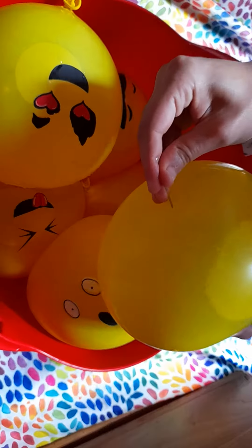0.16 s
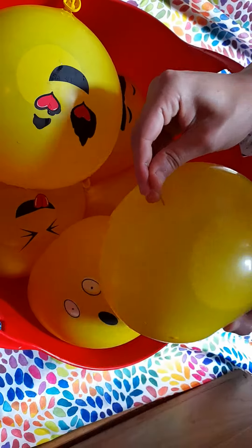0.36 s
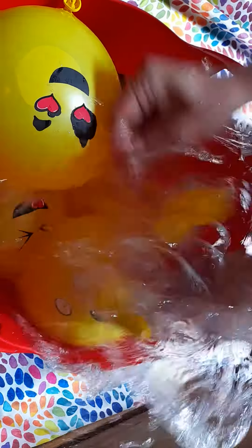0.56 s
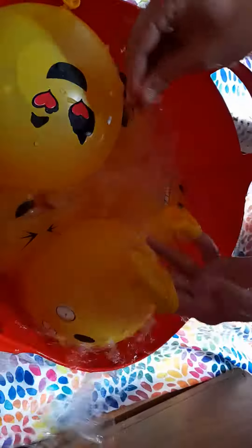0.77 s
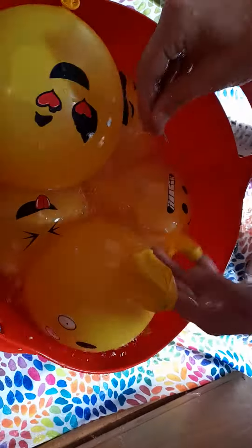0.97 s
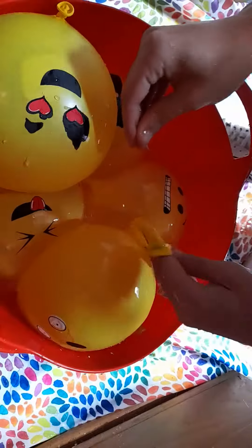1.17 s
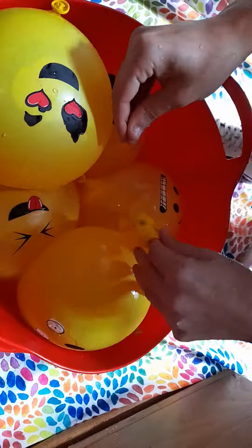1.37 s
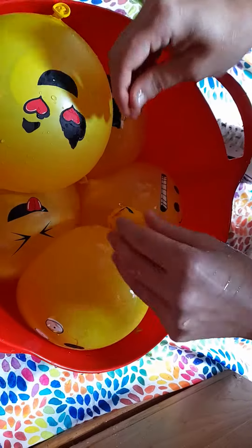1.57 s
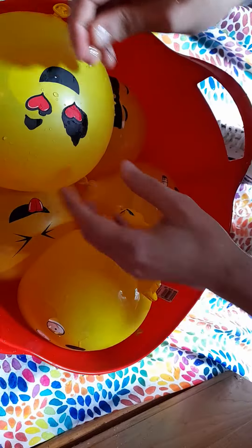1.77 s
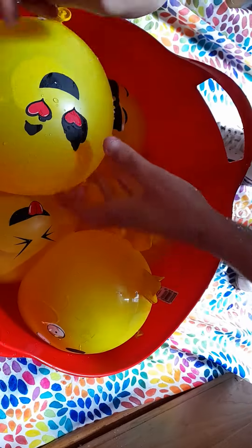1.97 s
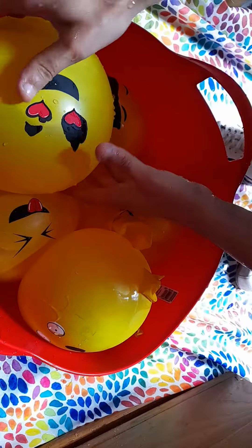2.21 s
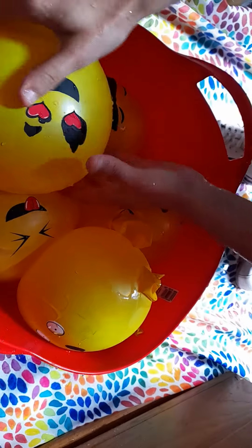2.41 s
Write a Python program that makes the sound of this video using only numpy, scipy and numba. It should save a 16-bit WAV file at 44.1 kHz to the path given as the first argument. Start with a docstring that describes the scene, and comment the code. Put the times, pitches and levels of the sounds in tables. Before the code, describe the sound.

A water balloon bursts with a sharp wet pop, splashing over a plastic tub, then dripping

```python
"""In a small room, close to the microphone, a water balloon is pricked over a plastic tub of other balloons.
The skin rips as jerky noise, and a puff of air swings mostly the right side with a slow, dying wave.
Water falls as random clicks (spray, slaps, drumming on the tub) and ringing bubbles, and thins to drips.
Wet rubber ticks, squeaks and snaps in shaped noise and short rings; a hand bumps a full balloon,
heard as a few sinking tones. A faint hiss and a low rumble lie underneath."""
import sys
import numpy as np
from scipy import signal
from scipy.fft import rfft, irfft, next_fast_len
from scipy.io import wavfile
from numba import njit

SR = 44100
rng = np.random.default_rng(int(sys.argv[2]) if len(sys.argv) > 2 else 0)


def generate_wav(sig):
    """Save sig (samples, or channels by samples) to the path in sys.argv[1] as 16-bit PCM at SR."""
    pcm = np.round(np.clip(np.atleast_2d(sig).T, -1, 1) * 32767).astype(np.int16)
    wavfile.write(sys.argv[1], SR, pcm)


N = 108045
T = np.arange(N) / SR  # time of every sample, s
SIDES = np.array([[1], [-1]])  # left, right


def amp(db):
    """Turn decibels into gain."""
    return 10 ** (np.asarray(db) / 20)


def curve(rows, at):
    """Draw straight lines through (time, value) rows."""
    return np.interp(at, *np.array(rows).T)


def pan(db):
    """Left and right gains for a level difference; positive makes the left louder."""
    return amp(SIDES * db / 2)


def colour(x, points):
    """Filter through (Hz, dB) points, never ringing before the sound; white noise keeps its power."""
    size = next_fast_len(2 * N)
    hz, db = np.array(points, float).T
    grid_hz = np.arange(size // 2 + 1) * SR / size
    gain = amp(np.interp(np.log(grid_hz + 1), np.log(hz), db))
    # Folding the cepstrum forward in time gives the filter its minimum phase.
    cepstrum = irfft(np.log(gain / np.sqrt(np.mean(gain ** 2))), size)
    cepstrum[1:size // 2] *= 2
    cepstrum[size // 2 + 1:] = 0
    return irfft(rfft(x, size) * np.exp(rfft(cepstrum)), size)[..., :N]


def noise(alike):
    """Stereo white noise; the share "alike" of its power is common to both sides."""
    alike = np.clip(alike, 0, 1)
    common = np.sqrt(alike) * rng.standard_normal(N)
    return common + np.sqrt(1 - alike) * rng.standard_normal((2, N))


CONTACT_S = 0.00065  # length of the quick start


def fade(start, decay):
    """A quick start, then an exponential decay, like a short knock."""
    age = np.maximum(T - start, 0)
    return np.minimum(age / CONTACT_S, 1) * np.exp(-age / decay)


@njit
def rings(start, hz, t60, size, glide, rise):
    """Add up dying tones that swell over some cycles and glide up (down if glide is negative)."""
    out = np.zeros(N)
    for k in range(len(start)):
        first = int(start[k] * SR) + 1
        last = min(first + int(t60[k] * SR), N)
        for i in range(max(first, 0), last):
            t = i / SR - start[k]
            age = t / t60[k]
            swell = 1 - np.exp(-t * hz[k] / rise)
            tone = np.sin(2 * np.pi * hz[k] * t * (1 + glide * age))
            out[i] += size[k] * np.exp(-6.9 * age) * swell * tone
    return out


FULL_FLOW_DB, THINNING_DB = -28, 38  # level of the full flow; fall in level that leaves a tenth of the drops
SIDE_SPREAD_DB, SIDE_LAG_S = 3, .00016  # largest shift of each side, up or down, early or late


def shower(levels, per_s, scatter_db, count):
    """Random drops, fewer as the flow falls: times and sizes at each side, and a spare chance per drop."""
    when, spare, weight, side, angle = rng.random((count, 5)).T
    length = T[-1] - levels[0][0]
    time = levels[0][0] + when * length
    db = curve(levels, time)
    offered = count / length
    thinned = per_s * 10 ** (np.minimum(db - FULL_FLOW_DB, 0) / THINNING_DB)
    rate = np.minimum(thinned, offered)
    keep = rng.random(count) < rate / offered
    size = amp(-scatter_db * np.log(np.maximum(weight, .015)))  # many small drops, a few large
    # Fewer drops are each made larger, so the level still follows the table.
    size = size / np.sqrt(np.mean(size ** 2) * rate) * amp(db)
    size = size * rng.choice([-1, 1], count)
    times = time + SIDES * SIDE_LAG_S * (2 * angle - 1)
    sizes = size * amp(SIDES * SIDE_SPREAD_DB * (2 * side - 1))
    return times[:, keep], sizes[:, keep], spare[keep]


def clicks(times, sizes):
    """One sharp click for each drop at each side."""
    heard = []
    for t, s in zip(times, sizes):
        sample = np.clip(t * SR, 0, N).astype(int)
        heard.append(np.bincount(sample, s, N + 1)[:N])
    return np.array(heard) * np.sqrt(SR)


BUBBLE_GLIDE = .15  # strength of the upward glide


def swarm(times, sizes, hz, cycles):
    """Ringing bubbles; at equal size, short and long ones get about equal energy."""
    t60 = cycles / hz
    evened = np.sqrt(4 * np.log(1000) / t60)
    return np.array([rings(t, hz, t60, s * evened, BUBBLE_GLIDE, 0.35) for t, s in zip(times, sizes)])


# Tone of the faint hiss [f/Hz, level/dB]
FLOOR_COLOUR = [(100, -5), (300, -0.5), (600, -1.5), (1100, 1), (2200, 0), (3200, -4.5), (6000, 0),
                (8300, -11.5), (13000, -7), (16000, -11.5)]
# Tone of the low rumble [f/Hz, level/dB]
RUMBLE_COLOUR = [(15, -25.5), (60, 5), (110, -2.5), (250, -17), (600, -20), (3000, -59.5)]
FLOOR_DB, FLOOR_SWELL_DB, RUMBLE_DB = -77.5, 11.5, -78  # hiss at the start; its rise to the end; rumble


def background():
    """Filtered noise makes a slowly swelling hiss and a steady low rumble."""
    hiss = colour(noise(0.17), FLOOR_COLOUR) * amp(FLOOR_DB + FLOOR_SWELL_DB * T / T[-1])
    return hiss + colour(noise(0.42), RUMBLE_COLOUR) * amp(RUMBLE_DB)


ROOM_T60_S, ROOM_TREBLE_T60_S = 0.19, 0.28  # time to die by 60 dB, below and above 3 kHz
ROOM_DB, ROOM_TREBLE_DB, ROOM_GAP_S = -8, -11, .004  # echo levels; wait before the echo


def room(x):
    """Many echoes blur into dying noise; the bass echo is stronger, the treble echo dies more slowly."""
    t = T[:SR // 2]
    out = x
    for kind, t60, db in (("low", ROOM_T60_S, ROOM_DB), ("high", ROOM_TREBLE_T60_S, ROOM_TREBLE_DB)):
        tail = rng.standard_normal((2, len(t))) * amp(-60 * t / t60) * (t > ROOM_GAP_S)
        tail = tail / np.sqrt(np.sum(tail[0] ** 2))
        tail = signal.sosfilt(signal.butter(2, 3000, kind, fs=SR, output="sos"), tail)
        mixed = tail + 0.21 * tail[::-1]  # a little of the other side
        out = out + amp(db) * signal.fftconvolve(x, mixed, axes=1)[:, :N]
    return out


TUB_ECHO_DB, TUB_NEAR_S, TUB_FAR_S = -13, .0004, .004  # level of each echo; shortest and longest delay


def tub(x, count=3):
    """The plastic walls throw the treble back within a few milliseconds, differently to each side."""
    bright = signal.sosfilt(signal.butter(2, 2200, "high", fs=SR, output="sos"), x)
    delay = TUB_NEAR_S + (TUB_FAR_S - TUB_NEAR_S) * rng.random((2, count))
    lags = (delay * SR).astype(int)
    echoes = [sum(np.pad(side, (k, 0))[:N] for k in row) for side, row in zip(bright, lags)]
    return x + amp(TUB_ECHO_DB) * np.array(echoes)


# How much louder the left side hears than the right [f/Hz, level/dB]
SIDE_BALANCE = [(200, -0.5), (1100, -.5), (2100, 2.5), (3800, 0.5), (8000, -3), (13000, -1.5)]


def balance(x):
    """The two sides hear treble and bass unequally: half the difference goes to each."""
    left = colour(x[0], [(hz, db / 2) for hz, db in SIDE_BALANCE])
    right = colour(x[1], [(hz, -db / 2) for hz, db in SIDE_BALANCE])
    return np.array([left, right]) * pan(-0.94)


# Tones of a bumped full balloon [f/Hz, level/dB, time to die by 60 dB t60/s]
BUMP_MODES = [(170, -44, 0.058), (307, -24.5, 0.025), (598, -26, 0.028), (820, -36, 0.025)]
# Tone of the water sloshing inside [f/Hz, level/dB]
SLOSH_COLOUR = [(50, -5), (160, -12), (320, 4), (480, 2.5), (700, 2.5), (1000, -16), (1400, -26),
                (5000, -26)]
BUMP_S, BUMP_RISE_S, BUMP_PAN_DB = 2.2495, 0.0073, 4
BUMP_STRETCH, BUMP_RELAX_S = 0.495, .007  # the pressed skin starts sharp by this share, then relaxes
SLOSH_DB, SLOSH_DECAY_S = -45, 0.024


def bump():
    """A hand bumps a full balloon: its pitch drops as the skin relaxes, and its water sloshes."""
    age = np.maximum(T - BUMP_S, 0)
    turns = age + BUMP_STRETCH * BUMP_RELAX_S * (1 - np.exp(-age / BUMP_RELAX_S))
    skin = sum(amp(db - 60 * age / t60) * np.sin(2 * np.pi * hz * turns) for hz, db, t60 in BUMP_MODES)
    slosh = colour(noise(0.84), SLOSH_COLOUR) * fade(BUMP_S, SLOSH_DECAY_S) * amp(SLOSH_DB)
    rise = 1 - np.exp(-(age / BUMP_RISE_S) ** 2)
    return (skin + slosh) * rise * pan(BUMP_PAN_DB)


SQUEAK_S, SQUEAK_HZ, SQUEAK_DB, SQUEAK_T60_S, SQUEAK_PAN_DB = 1.7348, 5270, -41.5, 0.015, -10


def squeak():
    """A wet finger slips on rubber for an instant: one short high tone that glides slightly down."""
    start, hz, t60 = np.array([SQUEAK_S]), np.array([1. * SQUEAK_HZ]), np.array([SQUEAK_T60_S])
    return rings(start, hz, t60, amp([SQUEAK_DB]), -.03, 4.0) * pan(SQUEAK_PAN_DB)


# Tone of the snapping rubber [f/Hz, level/dB]
SNAP_COLOUR = [(150, -26), (600, -6), (1400, -14.5), (2000, -5), (2400, 2), (3100, -11), (4200, -6.5),
               (6000, -18.5), (9000, -28), (16000, -29)]
SNAP_S, SNAP_DB, SNAP_DECAY_S, SNAP_PAN_DB = 1.6683, -39.5, 0.0046, 2.5
SNAP_TAIL_DB, SNAP_TAIL_S = -17.5, 0.02  # tail level below the crack; its decay
SNAP_RING_HZ, SNAP_RING_DB, SNAP_RING_T60_S = 2390, -40.5, 0.019


def snap():
    """A scrap of rubber snaps: a noisy crack with a fainter, longer tail, and a brief ring."""
    crack = fade(SNAP_S, SNAP_DECAY_S) + amp(SNAP_TAIL_DB) * fade(SNAP_S, SNAP_TAIL_S)
    noisy = colour(noise(0.46) * crack, SNAP_COLOUR) * amp(SNAP_DB)
    ring = fade(SNAP_S, SNAP_RING_T60_S / np.log(1000)) * np.sin(2 * np.pi * SNAP_RING_HZ * (T - SNAP_S))
    return (noisy + amp(SNAP_RING_DB) * ring) * pan(SNAP_PAN_DB)


# Small drops and wet rubber ticking near the microphone [t/s, level/dB, left over right level/dB]
TICKS = [(.224, -31, 28), (.233, -50, -2), (0.323, -35.5, 18.5), (0.331, -18, -0.5), (0.34, -46, -5),
         (0.531, -25, -16), (0.628, -26, -8), (0.633, -27, 3), (0.642, -22.5, -5), (0.647, -28, 14),
         (0.793, -31, -5), (.869, -42, -7), (.936, -43, -2), (1.026, -44, 7), (1.054, -37.5, -2),
         (1.149, -47, 7), (1.177, -39.5, 7), (1.196, -41, -2), (1.24, -54, -13), (1.326, -59, 0),
         (1.396, -51.5, 0), (1.465, -50, 4.5), (1.546, -61.5, -4), (1.602, -54, 4), (1.729, -59, 5),
         (1.874, -51.5, 3), (1.891, -55, -3)]
# Tone of the ticks [f/Hz, level/dB]
TICK_COLOUR = [(300, -34), (2000, -8), (6000, 15), (8500, 3), (13000, 14), (16500, -6)]
TICK_DECAY_S = 0.0023


def ticks():
    """Drops and wet rubber tick: tiny bright bursts of noise."""
    shape = sum(fade(t, TICK_DECAY_S) * amp(db) * pan(side) for t, db, side in TICKS)
    return colour(noise(0.16) * shape, TICK_COLOUR)


# Level of the water drumming on the tub [t/s, level/dB]
DRUM = [(.14, -51), (.22, -54), (.31, -38), (.45, -45.5), (.52, -36), (.6, -44.5), (.68, -38.5), (.81, -43),
        (.91, -49), (.98, -61.5), (1.05, -57), (1.15, -62), (1.28, -65.5), (1.38, -89), (1.6, -105)]
# Tone of the drumming [f/Hz, level/dB]
DRUM_COLOUR = [(30, -28), (65, -9), (95, -7.5), (117, 1.5), (140, -3), (168, -1), (200, -1.5), (235, 0),
               (270, 0.5), (320, -1.5), (500, -16.5), (1500, -64.5)]


def drumming():
    """Heavy water thuds on the tub and the balloons in it: random clicks filtered down to the bass."""
    times, sizes, _ = shower(DRUM, 1800, 3.55, count=6000)
    return colour(clicks(times, sizes), DRUM_COLOUR) * pan(0.32)


# Level of the fine spray [t/s, level/dB]
SPRAY = [(.12, -37.5), (.19, -36), (.27, -32), (.33, -27), (.42, -33.5), (.53, -29), (.6, -42),
         (.645, -36.5), (.68, -44), (.81, -44.5), (.92, -57.5), (1.01, -53), (1.05, -54.5), (1.12, -59),
         (1.195, -57), (1.23, -65.5), (1.5, -72.5), (1.9, -69.5), (2.45, -67.5)]
# Tone of the spray [f/Hz, level/dB]
SPRAY_COLOUR = [(200, -30.5), (1000, -3.5), (2500, 5.5), (3700, 1.5), (5500, 4), (7000, 2), (8200, -5.5),
                (10500, -3), (13500, 0), (16000, -10)]
DROPS_PER_S, DROP_SCATTER_DB, PATTER_DB, SPRAY_PAN_DB = 4000, 3, -1.5, 0  # drops at full flow
FIZZ_PER_S, FIZZ_SCATTER_DB, FIZZ_DB = 3500, 1.5, -2.5  # tiny bubbles at full flow
FIZZ_LOW_HZ, FIZZ_HIGH_HZ, FIZZ_CYCLES = 1204, 15660, 36  # cycles until a bubble has died by 60 dB


def spray():
    """Fine droplets patter on rubber, cloth and floor as clicks, and tiny bubbles fizz as short rings."""
    times, sizes, _ = shower(SPRAY, DROPS_PER_S, DROP_SCATTER_DB, count=30000)
    patter = clicks(times, sizes)
    times, sizes, spare = shower(SPRAY, FIZZ_PER_S, FIZZ_SCATTER_DB, count=15000)
    hz = FIZZ_LOW_HZ + (FIZZ_HIGH_HZ - FIZZ_LOW_HZ) * spare
    fizz = swarm(times, sizes, hz, FIZZ_CYCLES)
    return colour(amp(PATTER_DB) * patter + amp(FIZZ_DB) * fizz, SPRAY_COLOUR) * pan(SPRAY_PAN_DB)


# Level of the splashing [t/s, level/dB]
SPLASH = [(.12, -47), (.19, -42), (.3, -27), (.39, -29.5), (.45, -30), (.525, -31.5), (.6, -38), (.68, -37),
          (.81, -35.5), (.9, -44), (1.005, -46), (1.05, -39.5), (1.11, -49), (1.185, -42.5), (1.23, -54),
          (1.39, -58), (1.52, -72), (1.64, -83), (1.69, -57.5), (1.8, -74), (1.96, -67.5), (2.03, -84)]
# Tone of the bubble swarm [f/Hz, level/dB]
SPLASH_COLOUR = [(60, -39), (170, -15.5), (330, -1.5), (480, -1.5), (660, 3.5), (1000, 1), (1500, 2),
                 (2200, -1.5), (3200, -13), (9000, -14.5)]
# Tone of water slapping down, in the splash and the plops [f/Hz, level/dB]
SLAP_COLOUR = [(50, -26), (130, -18), (220, -6.5), (290, 5), (400, -1), (550, 7), (750, 3.5), (1800, 0),
               (3600, -5.5), (6500, -9), (8500, -21.5), (16000, -30)]
BUBBLES_PER_S, BUBBLE_SCATTER_DB = 1700, 2.5  # bubbles at full flow
BUBBLE_LOW_HZ, BUBBLE_HIGH_HZ, BUBBLE_CYCLES = 384, 3450, 9.1  # cycles until died by 60 dB
SLAP_SHARE, SPLASH_PAN_DB = 0.37, 2


def splash():
    """Falling water slaps down as clicks and traps a swarm of short-ringing bubbles."""
    times, sizes, spare = shower(SPLASH, BUBBLES_PER_S, BUBBLE_SCATTER_DB, count=12000)
    hz = BUBBLE_LOW_HZ * (BUBBLE_HIGH_HZ / BUBBLE_LOW_HZ) ** spare
    bubbles = colour(swarm(times, sizes, hz, BUBBLE_CYCLES), SPLASH_COLOUR)
    times, sizes, _ = shower(SPLASH, 2200, 2.5, count=8000)
    slaps = colour(clicks(times, sizes), SLAP_COLOUR)
    return (amp(-7) * bubbles + SLAP_SHARE * slaps) * pan(SPLASH_PAN_DB)


SURGES_PER_S, SURGE_DB = 130, 1.46  # random gain points; their typical size


def surges():
    """The water arrives in lumps: a quick random gain."""
    knots = rng.standard_normal(1000)
    return amp(SURGE_DB * np.interp(T * SURGES_PER_S, np.arange(len(knots)), knots))


# Lumps of water that land and trap air
# [t/s, pitch f/Hz, ring level/dB, slap level/dB, left over right level/dB]
PLOPS = [(.158, 490, -29.5, -47, 3.5), (.283, 560, -21.5, -32.5, 5.5), (0.287, 890, -23, -24.5, 4.5),
         (.3, 520, -20, -32.5, 4.5), (.3105, 650, -22, -23, -12), (0.322, 970, -19, -21, 7),
         (0.33, 1370, -15.5, -29.5, 16), (.369, 630, -28.5, -28, -0.5), (.381, 1116, -11.5, -27, 10.5),
         (.395, 638, -12.5, -33, 6), (.527, 668, -14.5, -22, 4.5), (0.645, 700, -36, -27, 4),
         (.686, 500, -20, -35, 1), (.731, 660, -26, -42.5, -5), (.776, 653, -17, -35, 5),
         (.787, 780, -17, -27.5, 1), (.810, 662, -11, -30.5, 2), (.874, 634, -24.5, -54, 5),
         (.829, 632, -21, -43, 1), (.910, 740, -21.5, -56, -9), (.918, 750, -17.5, -53, 2),
         (0.961, 1150, -28.5, -42.5, -4), (.963, 473, -31, -47, 11), (1.027, 678, -24.5, -25, 3),
         (1.044, 867, -19, -41, 7.5), (1.075, 690, -28, -32, 0.5), (1.118, 566, -32.5, -42, 4),
         (1.157, 1140, -28, -54, 11), (1.169, 625, -28, -48, 2), (1.185, 1650, -25, -32, 10.5),
         (1.195, 1455, -21, -41, 1), (1.263, 1070, -29, -67, -3), (1.273, 600, -36, -59, 3),
         (1.282, 297, -40, -69, -2), (1.337, 1590, -34.5, -62, 7), (1.358, 1590, -46, -87.5, 0),
         (1.374, 705, -35.5, -76, 2), (1.382, 1250, -34.5, -58, 8), (1.393, 1000, -37, -56, 5),
         (1.421, 665, -39, -74, 5), (1.473, 1016, -39.5, -74, -5), (1.548, 2300, -45.5, -73.5, 3),
         (1.579, 1470, -53, -73, 1), (1.602, 2090, -55, -69, 10), (1.722, 520, -41.5, -65, 9),
         (1.722, 1150, -42, -72, -8), (1.783, 1290, -40, -76, 7), (1.955, 627, -48, -81, 8)]
PLOP_CYCLES, PLOP_GLIDE, PLOP_RISE_CYCLES = 14.7, 0.046, 0.98  # cycles until died by 60 dB; glide; swell
SLAP_DECAY_S = 0.0038
# Follower bubbles: level against the first, longest delay, width of the pitch range
SATELLITE_DB, SATELLITE_SPREAD_S, SATELLITE_OCTAVES = -11.5, 0.015, 1.394


def plop_ring(start, hz, db, side):
    """Trapped air rings at both sides, its pitch rising."""
    t60 = PLOP_CYCLES / hz
    return np.array([rings(start, hz, t60, amp(db + s * side / 2), PLOP_GLIDE, PLOP_RISE_CYCLES)
                     for s in (1, -1)])


def plops(count=3):
    """Each lump of water slaps, its bubble rings with rising pitch, and a few fainter ones follow."""
    start, hz, ring_db, slap_db, side = np.array(PLOPS, float).T.copy()
    out = plop_ring(start, hz, ring_db, side)
    for late, higher in rng.random((len(hz), 2, count)).T:
        follower_hz = hz * 2 ** (SATELLITE_OCTAVES * higher - .2)
        out = out + plop_ring(start + SATELLITE_SPREAD_S * late, follower_hz, ring_db + SATELLITE_DB, side)
    slap = sum(fade(t, SLAP_DECAY_S) * amp(db) * pan(p) for t, db, p in zip(start, slap_db, side))
    return out + colour(noise(0.42) * slap, SLAP_COLOUR)


POP_S = .1106  # the moment of the burst
PUFF_DB, PUFF_LEFT = -7, -0.19  # the left swings weakly the opposite way
PUFF_START_HZ, PUFF_END_HZ, PUFF_SAG_S = 143.7, 39.7, 0.0092
PUFF_RISE_S, PUFF_DECAY_S = 0.0026, 0.011


def puff():
    """Released air thumps mostly the right side with a slowing, dying swing."""
    age = np.maximum(T - POP_S, 0)
    sag = (PUFF_START_HZ - PUFF_END_HZ) * PUFF_SAG_S * (1 - np.exp(-age / PUFF_SAG_S))
    turns = PUFF_END_HZ * age + sag
    envelope = (1 - np.exp(-(age / PUFF_RISE_S) ** 2)) * np.exp(-age / PUFF_DECAY_S)
    return amp(PUFF_DB) * np.sin(2 * np.pi * turns) * envelope * np.array([[PUFF_LEFT], [1]])


# Tone of the rip and its mist [f/Hz, level/dB]
RIP_COLOUR = [(60, -19), (210, -6), (310, 13), (480, 3), (780, 1.5), (1030, 2), (1400, -4), (2500, 0),
              (3700, -9), (6200, 2), (8500, -5.5), (13500, 3.5), (16500, -0.5)]
RIP_ATTACK_S, RIP_S, RIP_RELEASE_S, RIP_DB, RIP_PAN_DB = .0025, 0.0065, .004, -18.5, -6.5
RIP_JERKS_PER_S, RIP_JERK_DB = 900, 2.5  # strength before the random factor
MIST_DB, MIST_DECAY_S = -22, 0.017


def pop():
    """The skin rips open in jerks within a few milliseconds and flings off a hissing mist."""
    attack = np.clip((T - POP_S) / RIP_ATTACK_S, 0, 1)
    release = np.exp(-np.maximum(T - POP_S - RIP_S, 0) / RIP_RELEASE_S)
    jerks = rng.uniform(-1.2, 1, 4000) * np.sqrt(3)
    jerky = amp(RIP_JERK_DB * np.interp(T * RIP_JERKS_PER_S, np.arange(len(jerks)), jerks))
    rip = noise(0.14) * attack * release * jerky * amp(RIP_DB) * pan(RIP_PAN_DB)
    mist = noise(0.07) * fade(POP_S, MIST_DECAY_S) * amp(MIST_DB)
    return colour(rip + mist, RIP_COLOUR)


def scene():
    """Burst, water and hands in the tub and room, over a faint hiss and rumble."""
    water = (splash() + spray()) * surges() + drumming() + plops()
    in_tub = tub(pop() + water + ticks())
    in_room = room(in_tub + snap() + squeak() + bump())
    return balance(in_room) + puff() + background()


TOP_HZ = 15950


def record(dry):
    """A steep low-pass filter removes the very highest treble."""
    return signal.sosfilt(signal.ellip(10, .2, 80, TOP_HZ, fs=SR, output="sos"), dry)


dry = scene()
out = record(dry)
generate_wav(out)
```